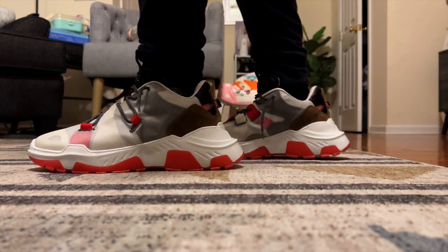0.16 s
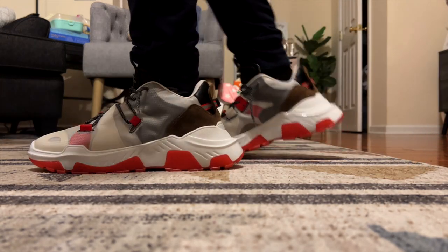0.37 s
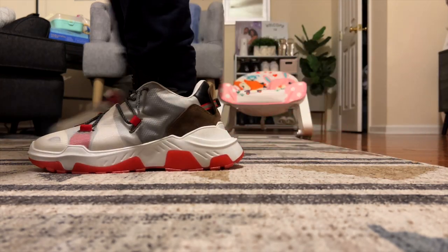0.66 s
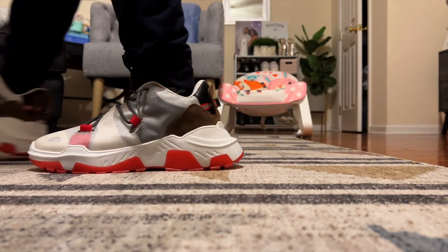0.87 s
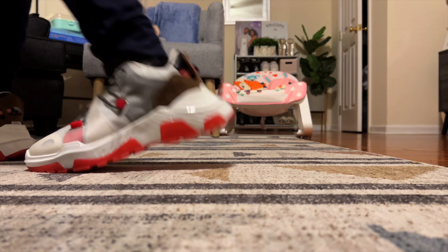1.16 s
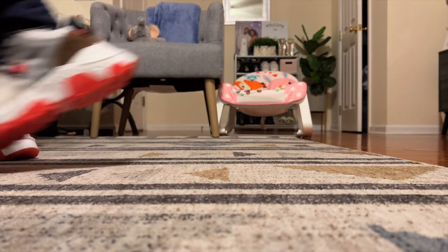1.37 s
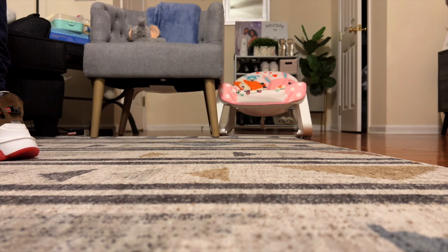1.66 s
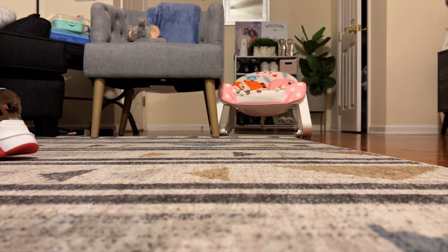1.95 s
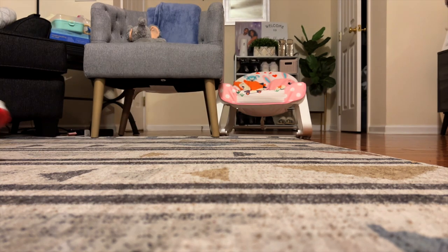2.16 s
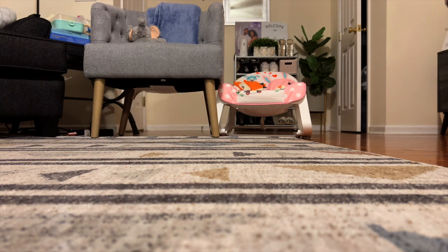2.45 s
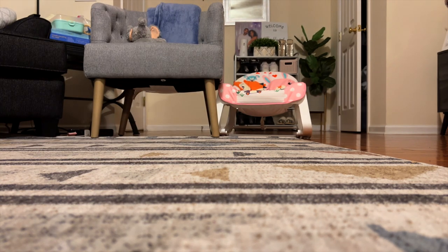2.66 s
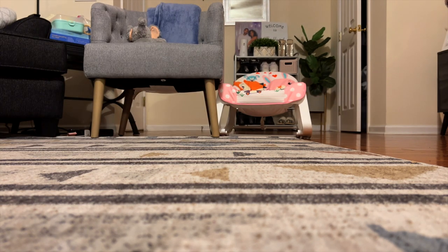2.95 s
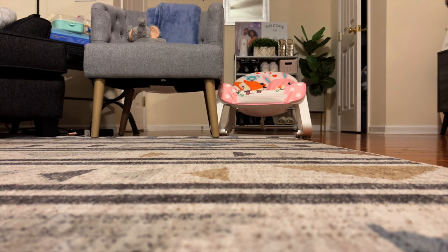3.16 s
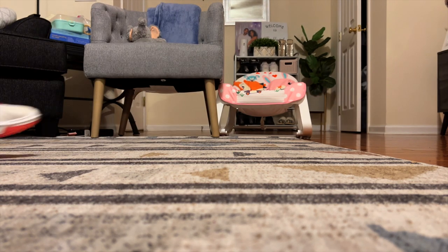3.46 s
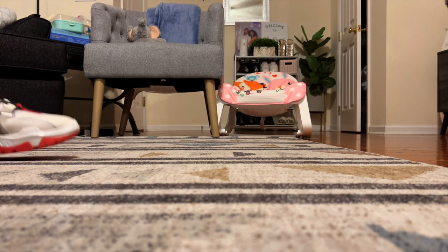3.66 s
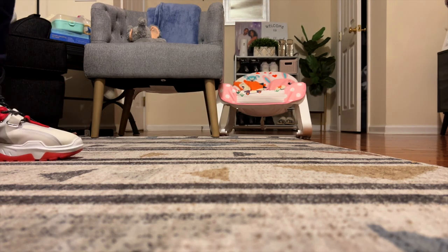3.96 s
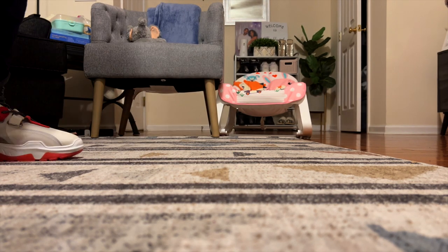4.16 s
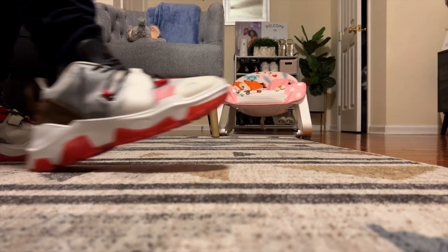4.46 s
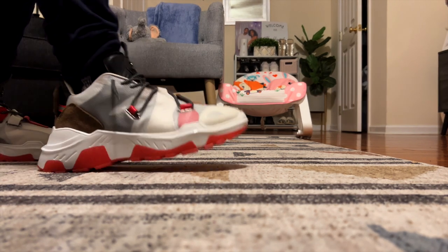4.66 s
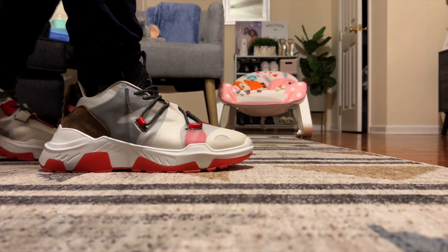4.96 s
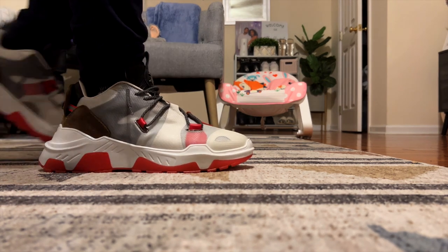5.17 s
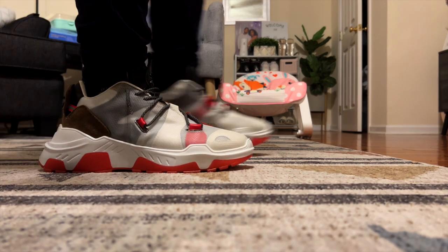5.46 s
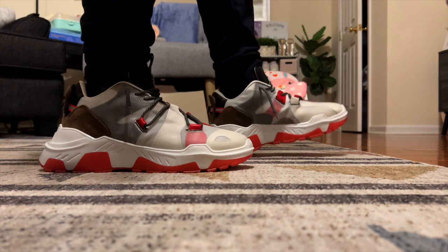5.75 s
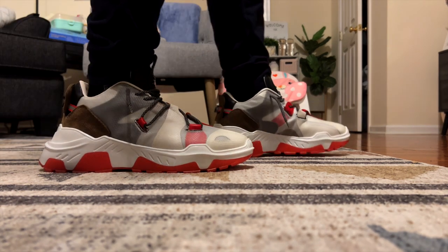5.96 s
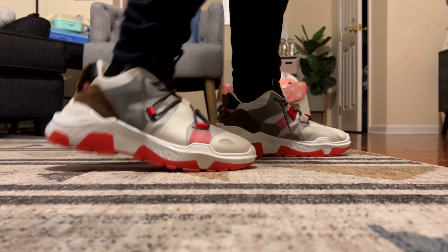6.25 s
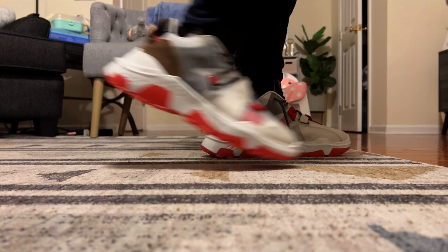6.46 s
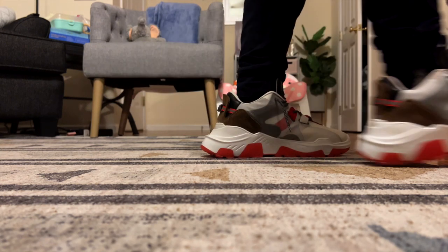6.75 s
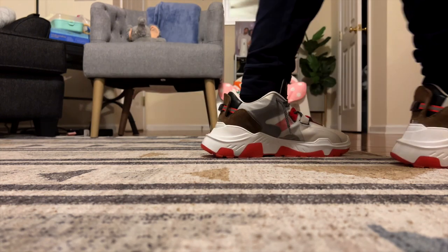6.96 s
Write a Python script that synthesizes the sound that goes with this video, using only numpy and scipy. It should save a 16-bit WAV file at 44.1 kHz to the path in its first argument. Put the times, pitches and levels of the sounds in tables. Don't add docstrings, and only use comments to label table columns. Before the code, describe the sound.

A quiet living room heard from floor level in stereo, with soft hiss, low mains hum and a distant motor faintly swelling and fading. Thick-soled shoes move on a rug over wooden boards. After barely audible shifting and a soft thud near 0.3 s, a firm double thump lands at 0.95-1.0 s, well forward and left. Faint sole scuffs follow around 1.4-1.7 s, then the strongest dull, bassy knock at 2.03 s. A very faint, low thud comes at 2.66 s, a muffled one at 2.99 s, and a firm clustered step at 3.66-3.72 s. From 4 to 5.8 s there are mostly light drags, tiny creaky ticks around 4.7-5.1 s, and small low knocks at 5.4-5.8 s. A softer double thud falls at 6.04-6.08 s with an airy puff just after, then a slight thud at 6.87 s and a final step right of centre at 6.99 s. Each blow dies within about a third of a second.

```python
import sys
import numpy as np
from scipy import signal
from scipy.fft import rfft, irfft, next_fast_len
from scipy.io import wavfile

SR = 44100
rng = np.random.default_rng(int(sys.argv[2]) if len(sys.argv) > 2 else 0)


def bounce(signal):
    frames = np.transpose(np.atleast_2d(signal))
    limited = np.clip(frames, -1, 1)
    pcm = np.round(limited * 32767).astype(np.int16)
    wavfile.write(sys.argv[1], SR, pcm)


def level_to_linear(level):
    exponent = np.asarray(level, float) / 20
    return 10 ** exponent


N = 313330

# [s, dB, dB, dB, dB]
HARD_BLOWS = [(0.946, -16.5, -14, -25, -15.5), (1.002, -15, -17, -25.5, -13.5), (1.99, -29, 1.5, -10, 0.5),
              (2.027, -12, -9.5, -24, -13), (2.659, -36.5, -27, -29, -10.5), (2.942, -55, -6, -17, 1.5),
              (2.989, -22.5, -32.5, -65, -15), (3.657, -14.5, -18, -26.5, -17),
              (3.696, -21.5, -21.5, -33, -30), (3.717, -23, -23.5, -43, -8),
              (6.036, -23.5, -22.5, -46.5, -16.5), (6.078, -20.5, -19.5, -48, -11),
              (6.992, -23.5, -21, -29, -11.5)]
# [s, dB, dB, dB]
SOFT_THUDS = [(0.011, -58, -44, 16), (0.268, -34, -54, -9.5), (1.268, -33.5, -50.5, -6.5),
              (1.72, -50, -30, -28), (1.929, -47, -51, 4), (2.099, -34, -46, -14.5),
              (2.694, -37, -35, -3.5), (2.719, -38, -36, -3.5), (2.764, -51, -38, 8),
              (3.059, -49, -36.5, -8), (3.819, -34, -44, -16), (3.889, -52.5, -30, -3.5),
              (4.486, -53, -44, -12), (5.774, -51, -20.5, -14), (6.814, -50, -37, -19),
              (6.873, -31, -53, -13)]
# [s, dB]
WALKER_PAN = [
    (0, 6.5),
    (1, 3.5),
    (2, 2.5),
    (3, 2),
    (3.7, 2.5),
    (6.1, 3.5),
    (6.87, 3),
    (6.99, -3),
]
# [Hz, dB]
BOARD_COLOUR = [(25, -41), (60, -3.5), (150, 2.5), (280, -4), (520, -7.5), (1000, -11.5), (1300, -14.5),
                (1650, -36), (2150, -24), (2900, -38), (4900, -48), (5500, -68), (9000, -72), (16000, -100)]
# [Hz, s]
RING_T60 = [(40, .33), (100, 0.32), (250, .3), (700, .3), (1500, 0.25), (2500, 0.28), (5000, 0.18)]
# [Hz, dB]
SCATTER_COLOUR = [(40, 3.5), (100, 2.5), (200, -1), (700, 2), (1300, -3), (1650, 8.5), (2100, -10.5),
                  (3000, -1.5), (5000, -1.5)]
# [Hz, dB]
RATTLE_COLOUR = [(100, -13), (500, -1), (1500, 1), (2300, 2.5), (5000, 1)]

# [s, s to die 20 dB, dB, dB]
SOLE_PLANTS = [
    (0.0, .3, -67, -82),
    (1.42, .15, -67, -90),
    (1.668, .25, -56, -69),
    (2.66, .2, -67, -83),
    (4.462, .1, -56.5, -78),
    (5.77, .18, -62, -84),
    (6.01, .5, -70, -88),
    (6.81, .5, -65, -84.5),
    (7.03, .2, -57, -83),
]
# [s, s to swell or die 20 dB, dB, dB]
FOOT_SWINGS = [(0.2, .15, -70, -93), (0.47, .17, -70, -93), (0.92, .17, -64, -85), (1.14, .12, -64, -83),
               (1.3, .17, -63, -88), (1.56, .07, -68, -88), (1.985, .13, -61, -79), (2.2, .15, -64, -95),
               (2.375, .075, -65, -86), (2.94, .15, -69, -87), (3.2, .15, -69.5, -99),
               (3.48, .12, -70, -99), (3.65, .11, -65, -87), (3.85, .2, -68, -88), (4.005, .09, -66, -80),
               (4.56, .11, -65, -86), (4.74, .14, -66, -88), (4.866, .1, -65, -82), (5.02, .18, -65, -88),
               (5.37, .15, -70, -94), (5.62, .12, -78, -96), (6.25, .15, -68, -90),
               (6.388, .04, -66, -79.5), (6.45, .15, -72, -92), (6.72, .13, -70, -93), (6.9, .15, -65, -84)]
# [s, s to swell or die 20 dB, dB]
AIR_PUFFS = [(0.0, .02, -79), (0.49, .15, -92), (0.95, .2, -96), (1.68, .1, -89.5), (2.4, .15, -97),
             (2.63, .15, -95), (3.54, .15, -95.5), (3.76, .2, -87), (3.99, .12, -84), (4.57, .1, -93),
             (5.77, .04, -92), (6.16, .105, -73.5), (6.38, .15, -90), (6.84, .15, -95), (7.03, .12, -88.5)]
# [Hz, dB per Hz]
RUMBLE_COLOUR = [(25, -18.5), (55, -3.5), (100, -12), (200, -13.5), (400, -27.5)]
DRAG_COLOUR = [(120, -25), (300, -0.5), (600, -8), (1000, -9.5), (1500, -22), (2500, -34.5)]
SCUFF_COLOUR = [(710, -32), (1250, -2.5), (2030, 2), (2600, -8), (3300, -18), (7000, -26), (12000, -33)]
# [Hz, dB per Hz]
BRISTLE_COLOUR = [(2300, -24), (2800, -1), (3600, 1), (4200, -16), (6000, -26.5)]
# [Hz, dB per Hz]
AIR_COLOUR = [(5000, -31.5), (8500, -17.5), (11500, -10), (13500, -11.5), (15300, -3.5), (15800, 4.5)]
# [s, dB, Hz, dB]
UPPER_TICKS = [(1.2466, -59, 1960, 7.5), (1.3214, -66, 1860, 8), (1.657, -67, 990, -20),
               (3.8781, -64, 1920, 11), (4.012, -63, 2750, -8), (4.7132, -64.5, 2150, 21),
               (4.8115, -60, 2240, 9.5), (4.849, -55, 2160, 20), (4.8633, -54.5, 2200, 17),
               (4.8774, -59, 2430, 9), (4.9152, -55.5, 2130, 12), (4.9442, -63, 2130, 13),
               (4.9681, -53, 2210, 12), (5.0095, -61, 2230, 7.5), (4.79, -66, 2400, 9),
               (4.979, -62, 2000, 12), (5.082, -64, 1820, 12), (5.373, -44, 760, 4), (5.404, -48, 716, 1),
               (5.587, -45.5, 750, 5), (5.772, -50, 900, 3), (5.77, -51, 1700, 2), (5.374, -64, 2300, 3),
               (6.015, -64, 2400, 3), (5.7705, -64, 6400, 0.5), (5.7715, -71, 11500, 0.5),
               (6.3844, -61, 1900, 2), (6.991, -38, 1500, -3), (0.9465, -33, 2350, 8)]

# [s, dB]
MOTOR_LEVEL = [(0.0, -86), (0.39, -68.5), (0.65, -84), (1.45, -62), (2.18, -73), (2.45, -63), (2.65, -81.5),
               (3.06, -65), (3.48, -65), (4.05, -80), (4.67, -68.5), (5.1, -86), (5.44, -74), (5.79, -81.5),
               (6.15, -65), (6.86, -75), (7.1, -62)]
# [Hz, dB per Hz]
STILL_COLOUR = [(15, -36.5), (28, -17), (54, 1), (123, -3.5), (170, -2), (307, -1.5), (461, -5.5),
                (800, -13), (1470, -28), (2500, -34.5), (4500, -33), (9000, -37), (12500, -44),
                (14300, -58)]
# [Hz, -1 to 1]
PORT_LIKENESS = [(30, 0.86), (70, .94), (180, 0.92), (310, 0.31), (540, -.1), (940, -0.18), (1620, -.1),
                 (2800, 0), (8000, .2), (13000, .5)]
# [Hz, dB]
TREBLE_DIPS = [(9650, 0), (9900, -22.5), (10350, -18), (10700, 0.5), (13250, 5), (13500, -16.5),
               (14000, -18), (14300, -2)]


def contacts():
    thud_snap_db = -67
    rows = SLAP_ROWS() + [(s, db, hard, thud_snap_db, weight) for s, db, hard, weight in SOFT_THUDS]
    return [row + (-19 + 0.3 * max(-30 - row[1], 0),) for row in rows]


def SLAP_ROWS():
    return [tuple(row) for row in HARD_BLOWS]


def dying_noise(size, onset_s, early_db, early_s):
    hz, noise = stereo_noise(SCATTER_COLOUR, size)
    t, octave, swell = np.arange(size) / SR, np.log2(hz), 0
    for centre in np.arange(5, 14, 0.5):
        band = irfft(noise * np.clip(1 - 2 * abs(octave - centre), 0, 1), size)
        swell = swell + band * level_to_linear(-60 * t / at_hz(RING_T60, 2 ** centre))
    rattle = irfft(noise * level_to_linear(at_hz(RATTLE_COLOUR, hz) - at_hz(SCATTER_COLOUR, hz)), size)
    rattle = rattle * level_to_linear(early_db) * np.exp(-t / early_s)
    return rfft(swell * np.clip(t / onset_s, 0, 1) ** 2 + rattle)


def blows(turns=1.3, lead=0.23, stiff_hz=1100, echo_s=0.0017, echo_db=-12.0, far_dull_db=-4.5, lag_s=0.00013):
    out, size, margin = np.zeros((2, N)), 2 ** 14, 300
    hz = np.arange(size // 2 + 1) * SR / size + 1e-3
    spread = np.log(np.clip(hz, 35, stiff_hz) / 100) + np.maximum(hz / stiff_hz - 1, 0)
    chirp = np.exp(1j * (lead - 2 * np.pi * turns * spread))
    treble = at_hz([(170, 0), (500, 0.44), (1200, 1.024), (1600, 1.05), (1900, 0.37)], hz)
    snap = at_hz([(1600, 0), (1900, 0.75), (5000, 1.02)], hz)
    top = at_hz([(2600, 0), (5000, 0.35)], hz)
    bass = at_hz([(60, 2.1), (150, 0.0076)], hz)
    notch = at_hz([(1300, 1), (1650, 2.5), (2100, 0.8), (2600, -1)], hz)
    sided = at_hz([(30, 0.15), (200, 0.9), (600, 1.3)], hz) * [[0.5], [-0.5]]
    far = level_to_linear(far_dull_db * (treble + snap)) * np.exp(-2j * np.pi * hz * lag_s)
    far = far * (1 + level_to_linear(echo_db) * np.exp(-2j * np.pi * hz * echo_s)) / (1 + level_to_linear(echo_db))
    sample = np.arange(size)
    fade = np.minimum(sample / margin, 1) ** 2 * np.minimum(sample[::-1] / 3000, 1)
    for s, peak_db, hard_db, snap_db, weight_db, tail_db in contacts():
        place_db = np.interp(s, *np.transpose(WALKER_PAN))
        colour_db = at_hz(BOARD_COLOUR, hz) + (hard_db + 10.5) * treble
        colour_db = colour_db + (snap_db + 23) * snap + (weight_db + 14) * bass
        colour_db = colour_db - abs(snap_db + 23) * top + max(3 - place_db, 0) * notch
        wave = chirp * level_to_linear(colour_db)
        pan_db = place_db * sided
        ports = np.array([np.ones_like(far), far]) * level_to_linear(pan_db)
        height = abs(irfft((wave * ports).mean(axis=0), size)).max()
        scattered = dying_noise(size, onset_s=0.014, early_db=9.5, early_s=0.003)
        scattered = level_to_linear(tail_db - 19.5 + 0.53 * pan_db) * scattered
        sound = np.roll(irfft(wave * (ports + scattered), size), margin, axis=1) * fade
        add(out, sound * level_to_linear(peak_db) / height, s + 0.0008 - margin / SR)
    return out


def motion():
    plant_s, fall_s, *plant_db = np.transpose(SOLE_PLANTS)
    swing_s, half_s, *swing_db = np.transpose(FOOT_SWINGS)
    drag, scuff = [swells(plant_s, plant, 0.028, fall_s, bend=1.4) + swells(swing_s, swing, half_s, half_s, bend=1.5)
                   for plant, swing in zip(plant_db, swing_db)]
    hit_s, peak_db = np.transpose(contacts())[:2]
    settling = swells(hit_s + 0.08, peak_db - 38, rise_s=0.05, fall_s=0.25)
    rumble = drag * level_to_linear(2 * -5) + settling
    return over_rest(rumble, -72.5), over_rest(drag, -90), over_rest(scuff, -101)


def movement():
    rumble_db, drag_db, scuff_db = motion()
    rumble = hiss(RUMBLE_COLOUR, rumble_db, patchy_db=2.5, rate=12, pan_db=1.0)
    drag = hiss(DRAG_COLOUR, drag_db + 0.2, patchy_db=3.0, rate=30, pan_db=1.5)
    scuff = hiss(SCUFF_COLOUR, scuff_db + 0.2, patchy_db=2.55, rate=150, pan_db=10.5)
    bristle = hiss(BRISTLE_COLOUR, 1.45 * (scuff_db + 68) - 73, patchy_db=2.6, rate=70, pan_db=6.5)
    return rumble + drag + scuff + bristle


def puffs():
    s, half_s, db = np.transpose(AIR_PUFFS)
    puff_db = over_rest(swells(s, db, half_s, half_s, bend=1.8), -103)
    sealed_db = 1.5 * np.minimum(puff_db + 96.5, 0)
    return hiss(AIR_COLOUR, puff_db + sealed_db, patchy_db=3.5, rate=40, pan_db=1.0)


def ticks(t60=0.013, modes=((0.43, -1.0), (0.7, -4.0), (1, 0), (1.2, -6.0), (1.5, -16.0))):
    out, t = np.zeros((2, N)), np.arange(1500) / SR
    for s, peak_db, hz, pan_db in UPPER_TICKS:
        rings = [sum(level_to_linear(db) * np.sin(2 * np.pi * (hz * k * t + (k - 1) * chance)) for k, db in modes)
                 for chance in rng.random(2)]
        envelope = level_to_linear(peak_db - 2 - 60 * t / t60) * np.minimum(t / 0.0011, 1)
        add(out, envelope * rings * level_to_linear([[pan_db / 2], [-pan_db / 2]]), s)
    return out


def room_tone():
    t, mains_hz, motor_hz = np.arange(N) / SR, 119, 300
    still = hiss(STILL_COLOUR, -66 - 1.5, patchy_db=0.9, rate=3, pan_db=2.4)
    mains = level_to_linear(-69.5 - 2 + 1.5 * drift(7.5)) * np.sin(2 * np.pi * mains_hz * t + 0.6 * drift(7.1))
    motor_db = np.interp(t, *np.transpose(MOTOR_LEVEL)) - 2.5 + 3.0 * drift(9)
    motor = level_to_linear(motor_db) * np.sin(2 * np.pi * motor_hz * t + 0.88 * drift(7))
    return still + mains + motor


def at_hz(points, hz):
    point_hz, value = np.transpose(points)
    return np.interp(np.log(hz), np.log(point_hz), value)


def drift(rate):
    r = np.exp(-80 * np.pi * rate / SR)
    slow = signal.lfilter([1], [1, -2 * r, r * r], rng.standard_normal(N // 40 + 2002))[2000:]
    return np.interp(np.arange(N) / 40, np.arange(len(slow)), slow / slow.std())


def stereo_noise(spectrum, size):
    hz = np.arange(size // 2 + 1) * SR / size + 1e-3
    mid, side = rfft(rng.standard_normal((2, size)))
    alike = np.clip(at_hz(PORT_LIKENESS, hz), -1, 1)
    pair = np.sqrt(1 + alike) * mid + np.sqrt(1 - alike) * side * [[1], [-1]]
    return hz, level_to_linear(at_hz(spectrum, hz)) * pair


def hiss(spectrum, level_db, patchy_db, rate, pan_db):
    size = next_fast_len(N)
    closed = list(spectrum) + [(spectrum[-1][0] * 1.2, -90)]
    noise = irfft(stereo_noise(closed, size)[1], size)[:, :N]
    noise = noise / noise.mean(axis=0).std()
    return noise * level_to_linear(level_db + patchy_db * drift(rate)) * level_to_linear([[pan_db / 2], [-pan_db / 2]])


def swells(s, db, rise_s, fall_s, bend=1.0):
    late = np.arange(0, N / SR, 0.001)[:, None] - s
    away = np.where(late < 0, -late / rise_s, late / fall_s)
    return (level_to_linear(db - 20 * np.minimum(away, 5) ** bend) ** 2).sum(axis=1)


def over_rest(power, rest_db):
    level_db = 10 * np.log10(power + level_to_linear(rest_db) ** 2)
    return np.interp(np.arange(N) / SR * 1000, np.arange(len(power)), level_db)


def add(out, sound, s):
    i = max(round(s * SR), 0)
    out[:, i:i + sound.shape[1]] += sound[:, :N - i]


def scene():
    return blows() + movement() + puffs() + ticks() + room_tone()


def top_cut(x):
    return signal.sosfilt(signal.butter(12, 15730, fs=SR, output="sos"), x)


def record(dry):
    hz = np.arange(N // 2 + 1) * SR / N + 1e-3
    heard = irfft(rfft(dry) * level_to_linear(at_hz(TREBLE_DIPS, hz)), N)
    return top_cut(heard)


dry = scene()
out = record(dry)
bounce(out)
```